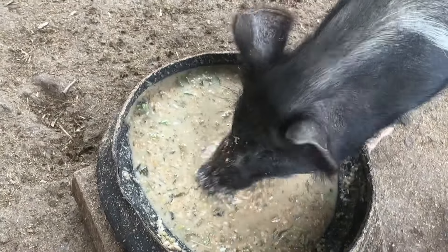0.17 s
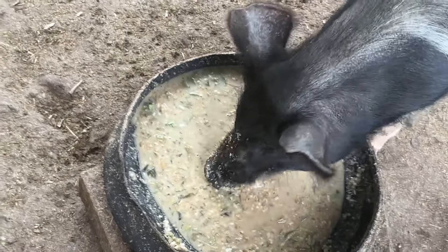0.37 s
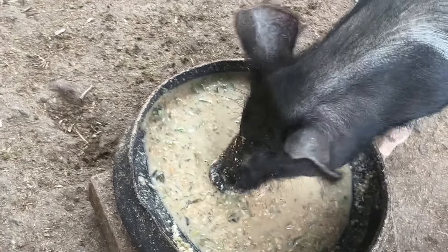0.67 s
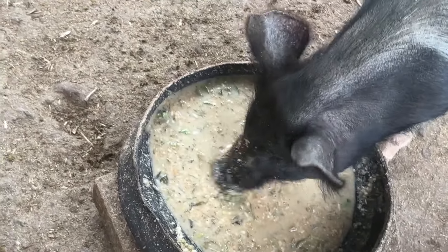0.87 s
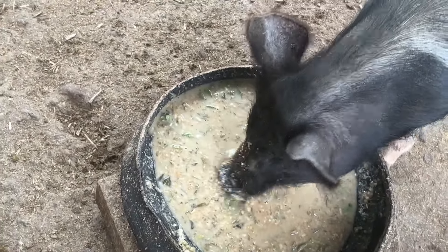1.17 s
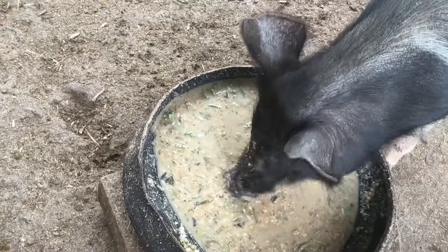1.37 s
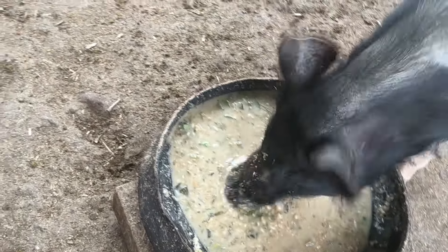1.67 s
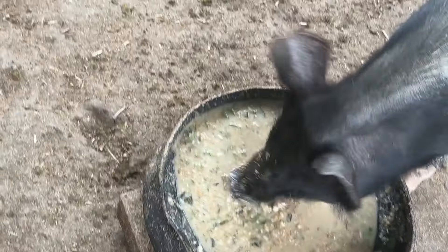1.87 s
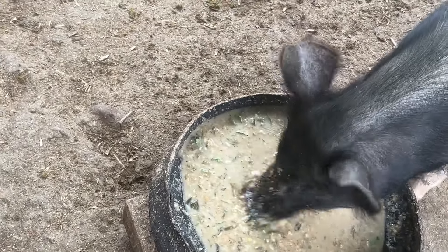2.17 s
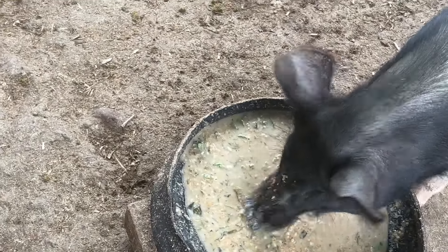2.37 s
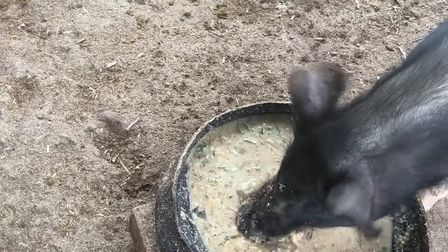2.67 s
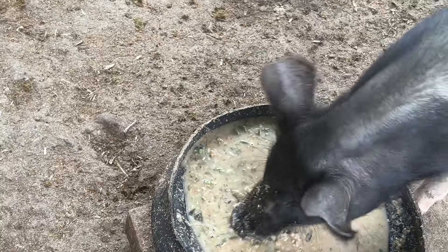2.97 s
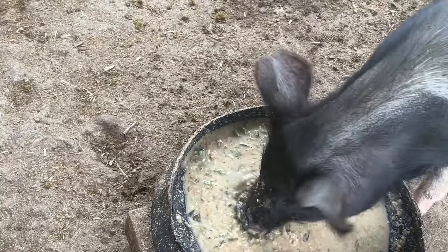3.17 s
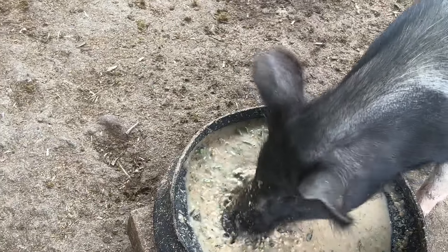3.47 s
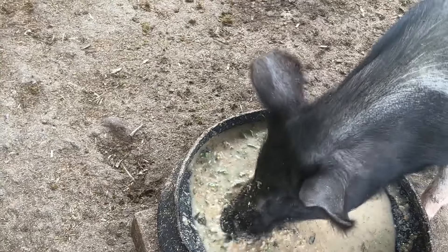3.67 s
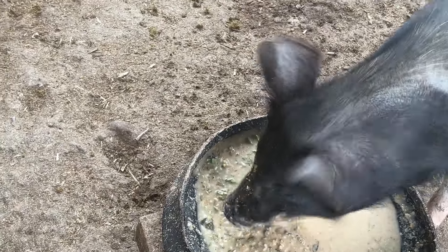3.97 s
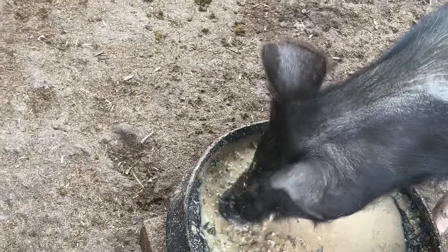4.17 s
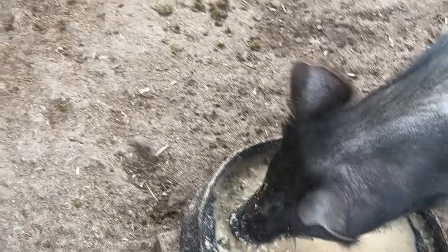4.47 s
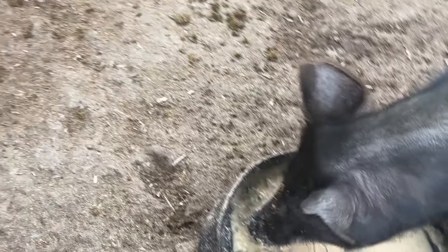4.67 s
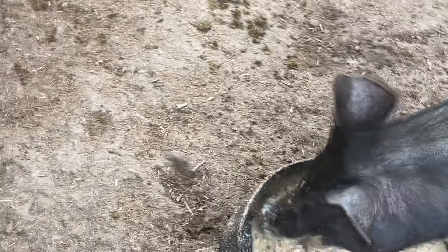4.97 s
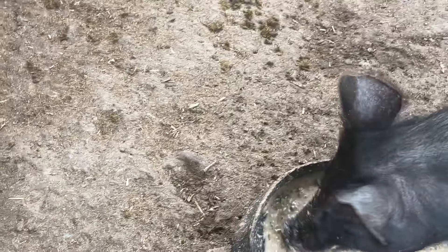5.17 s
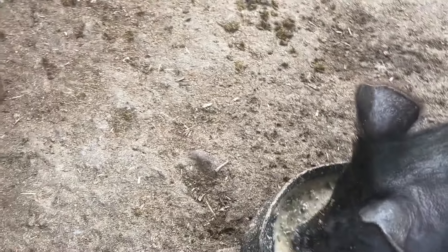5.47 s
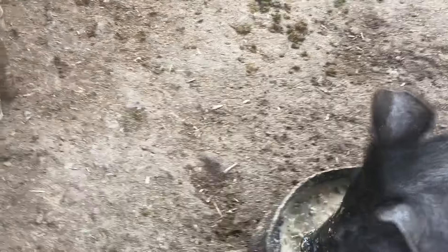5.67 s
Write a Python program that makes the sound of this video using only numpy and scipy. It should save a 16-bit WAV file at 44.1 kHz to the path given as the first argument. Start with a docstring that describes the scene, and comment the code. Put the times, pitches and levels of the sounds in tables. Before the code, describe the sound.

A pig eats wet mash from a rubber tub in an open pen, about a metre below the microphone. Its jaws smack three or four times a second, each chew a sharp, wet click with a hollow little plop. The mash squelches and faintly fizzes, and the snout sometimes bumps the tub softly. The chewing eases near the end. Faint, very high insect chirps pulse over quiet air.

```python
"""A pig eating wet mash

A pig eats from a rubber tub in an open pen, a metre below the microphone. Each chew is a
cluster of bursting saliva films and bubbles over hollow plops of the mouth. Mash squelches
and fizzes, and the snout bumps the tub. Insects buzz in short, very high chirps over quiet air."""
import sys
import numpy as np
from scipy import signal
from scipy.fft import rfft, irfft
from scipy.io import wavfile

SR = 44100
rng = np.random.default_rng(int(sys.argv[2]) if len(sys.argv) > 2 else 0)


def persist_wave(psi):
    """Save psi, clipped to +-1, as 16-bit WAV."""
    counts = np.round(np.clip(psi, -1, 1) * 32767).astype(np.int16)
    wavfile.write(sys.argv[1], SR, np.atleast_2d(counts).T)


N = 255763
TIME = np.arange(N) / SR
HIGHEST_HZ = 16050
LEAD_S = 256 / SR  # a bubble starts to swell before its peak
BUBBLE_TIME = np.arange(1024) / SR - LEAD_S
TINY_BUBBLE_TIME = BUBBLE_TIME[:600]
SNAP_HZ, LIP_HZ = 4234, 3000  # middle pitches of the lesser bubbles
SNAP_RING_DB, LIP_SPRAY_DB = -6, -8  # compared with the crack they belong to

# Smacks of the jaws, three or four a second. Each row: start in seconds, length in seconds,
# first snap in dB, last snap in dB, spray in dB, big bubble's pitch in Hz, its level in dB,
# base pitch of the mouth in Hz, plop in dB, squelch in dB.
JAW_SMACKS = [(.1612, 0.0093, -36, -27, -32.5, 4160, -33, 880, -24, -39),
              (0.4285, 0.0085, -35, -37, -28.5, 4470, -32, 833, -43.5, -45),
              (0.8348, 0.015, -41, -41, -37.5, 5970, -33, 694, -32, -42),
              (1.0778, 0.03, -27, -31.5, -31, 1700, -29.5, 925, -42, -65),
              (1.4518, .011, -30, -33, -33.5, 7410, -35, 738, -30.5, -51),
              (1.655, 0.0065, -31.5, -25, -27, 4170, -20, 810, -28.5, -36.5),
              (1.8553, .019, -30, -39, -37, 1990, -37.5, 960, -34.5, -46),
              (2.135, .011, -37, -25, -31.5, 3580, -31, 840, -28, -34),
              (2.4418, 0.021, -31, -36.5, -30, 7560, -30.5, 766, -31, -41),
              (2.6349, 0.013, -32.5, -30.5, -31, 1750, -32.5, 680, -25, -39),
              (2.8378, 0.013, -21.5, -20.5, -26, 2046, -15, 740, -19.5, -35.5),
              (3.1053, .037, -35, -38.5, -33, 1695, -35.5, 760, -34, -42.5),
              (3.345, .003, -25.5, -51, -26, 4280, -22.5, 873, -31.5, -45),
              (3.563, 0.0081, -29, -27.5, -29, 4090, -25, 740, -33.5, -51),
              (3.77, 0.0023, -24, -42, -31.5, 8340, -36, 630, -24, -50),
              (3.9843, 0.023, -30.5, -64, -35, 7980, -36, 840, -31, -41.5),
              (4.23, 0.028, -42, -29, -29, 6480, -31, 687, -34.5, -38),
              (4.647, 0.0054, -35, -48, -31.5, 3604, -27.5, 806, -38.5, -42.5),
              (5.008, 0.006, -33, -35, -38.5, 3940, -33, 586, -30.5, -45)]


def tongue_snaps(count=3, spread_octaves=0.465, peel_db=-7.5):
    """A smack opens and ends with a snap; small ones fall between as the tongue peels away."""
    for smack, chance in zip(JAW_SMACKS, rng.random((len(JAW_SMACKS), count + 2, 3))):
        start, length, first_db, last_db, spray_db, big_hz, big_db = smack[:7]
        pitches = SNAP_HZ * 2 ** (spread_octaves * (2 * chance[:, 0] - 1))
        first = start, first_db, spray_db, first_db >= last_db
        last = start + length, last_db, spray_db - 4.5, first_db < last_db
        for hz, (at, db, spray, louder) in zip(pitches, (first, last)):
            if louder:  # the louder snap frees the big bubble
                yield at, big_hz, big_db, db, spray
            else:
                yield at, hz, db + SNAP_RING_DB, db, spray
        for k, (hz, (_, place, size)) in enumerate(zip(pitches[2:], chance[2:])):
            at = start + (length + .006) * (k + place) / count
            scatter_db = 4.5 * (2 * size - 1)
            db = (first_db + last_db) / 2 + peel_db + scatter_db
            yield at, hz, db, db, spray_db - 14.5 + scatter_db


def saliva_ticks(count=4, early_s=0.0083, reach_s=0.072):
    """The tongue comes unstuck just before each smack, and threads of saliva tick around it."""
    chances = 2 * rng.random((len(JAW_SMACKS), count, 3)) - 1
    for (start, _, first_db, _, spray_db, *_), chance in zip(JAW_SMACKS, chances):
        unstick_db = first_db - 11.5
        yield start - early_s, SNAP_HZ, unstick_db + SNAP_RING_DB, unstick_db, spray_db - 10
        for when, octave, size in chance:
            db = -46 + 6.5 * size
            yield start + reach_s * when, LIP_HZ * 2 ** octave, db, db, db + LIP_SPRAY_DB


# The lips parting. Each row: time in seconds, bubble pitch in Hz, bubble in dB, crack in dB.
LIP_CLICKS = [(0.141, 4670, -34, -34.5), (0.1838, 10900, -31, -37.5), (0.394, 3510, -28.5, -34),
              (0.869, 2797, -42, -38), (1.1405, 6260, -43, -42.5), (1.1513, 4050, -37, -36.5),
              (1.3944, 2610, -29.5, -35.5), (1.4375, 7400, -34, -38.5), (1.445, 4530, -31, -34),
              (1.5887, 3460, -32.5, -31.5), (1.8174, 3780, -40, -38), (1.9248, 4080, -32, -37),
              (2.085, 1350, -30, -35), (2.3737, 1735, -38.5, -36), (2.398, 8800, -41, -52),
              (2.5958, 1300, -30.5, -28.5), (2.7933, 1960, -43, -36.5), (3.0598, 3150, -34, -34.5),
              (3.3119, 3970, -54, -38.5), (3.508, 1940, -33, -44), (3.8059, 3270, -32.5, -39.5),
              (3.8646, 3890, -33.5, -33), (3.9491, 1850, -34, -42), (4.1763, 2975, -33, -36.5),
              (4.1957, 3100, -37.5, -50), (4.5345, 3040, -48, -36.5), (4.564, 1850, -37, -43),
              (4.9049, 2710, -39, -31), (4.9428, 1820, -34, -41), (4.9736, 1830, -34.5, -41),
              (5.1949, 4060, -36, -42.5), (5.2589, 1870, -27, -37), (5.329, 4280, -34.5, -40),
              (5.6073, 4610, -44, -37)]


def lip_snaps(twin_gap_s=0.0049, twin_octaves=0.48, twin_db=-5, spray_db_per_octave=7):
    """A lip film bursts with a click and a softer twin; the smaller the bubble, the more spray."""
    chances = 2 * rng.random((len(LIP_CLICKS), 2)) - 1
    for (at, hz, ring_db, crack_db), (gap, octave) in zip(LIP_CLICKS, chances):
        spray_db = crack_db + LIP_SPRAY_DB + spray_db_per_octave * np.log2(hz / LIP_HZ)
        yield at, hz, ring_db, crack_db, spray_db
        twin_hz = LIP_HZ * 2 ** (twin_octaves * octave)
        yield at + twin_gap_s * gap, twin_hz, ring_db + twin_db, crack_db + twin_db, spray_db + twin_db


def saliva_clicks(rise_s=0.00083, ring_s=0.00227):
    """A saliva film tears with a crack and a fine spray, and the bubble behind it rings."""
    out = np.zeros(N)
    for at, hz, ring_db, crack_db, spray_db in [*tongue_snaps(), *lip_snaps(), *saliva_ticks()]:
        decay_s = ring_s * np.exp(0.22 * rng.standard_normal())
        glide = rng.normal(0.017, 0.1027)
        crack = film_burst(low_hz=1292, high_hz=6616, scatter_s=0.0011, cycles=4.0, brightness=0.78)
        spray = film_burst(low_hz=6540, high_hz=15810, scatter_s=0.001, cycles=3.5, brightness=0.22)
        add(out, at - LEAD_S, at_level(bubble(hz, rise_s, decay_s, glide), ring_db))
        add(out, at - LEAD_S, at_level(crack, crack_db - 3))
        add(out, at - LEAD_S, at_level(spray, spray_db + 1))
    return out


def film_burst(low_hz, high_hz, scatter_s, cycles, brightness, count=16):
    """A film breaks into a handful of tiny pops, high and low, within a few milliseconds."""
    place = (np.arange(count) + rng.random(count)) / count
    hz = (low_hz * (high_hz / low_hz) ** place)[:, None]
    gains = rng.uniform(0.21, 1, count) * hz[:, 0] ** brightness
    delays = scatter_s * rng.standard_normal((count, 1))
    return gains @ bubble(hz, cycles / hz, cycles / hz, 0.0522, TINY_BUBBLE_TIME - delays)


def bubble(hz, rise_s, decay_s, glide, t=BUBBLE_TIME):
    """A pocket of air rings, loudest at t = 0, its pitch sliding as it changes size."""
    loudness = np.exp(-(np.minimum(t, 0) / rise_s) ** 2 - np.maximum(t, 0) / decay_s)
    pitch = hz * (1 + glide * np.tanh(t / (2 * decay_s)))
    return loudness * np.sin(2 * np.pi * (np.cumsum(pitch, -1) / SR + rng.random(np.shape(hz))))


# The mouth widens during a smack, so its plops sink in pitch. Each row: how far through the
# smack (0 to 1), extra delay in seconds, pitch multiplier, level change in dB.
FALLING_PLOPS = [(0, 0.00094, 0.96, 1.5), (.55, 0.00094, 0.8505, -3.5), (0.902, 0.00078, 0.759, -1.5),
                 (1, .014, 0.611, -17)]
# Extra hollow mouth plops, some within a smack, some between chews.
# Each row: time in seconds, mouth pitch in Hz, level in dB.
EXTRA_PLOPS = [(.8476, 975, -27), (1.8668, 830, -30), (1.888, 817, -32.5), (2.571, 880, -32.5),
               (2.795, 906, -31.5), (3.8028, 647, -33), (4.0038, 690, -31.5), (4.019, 425, -29.5),
               (4.186, 923, -35), (4.398, 940, -39), (4.845, 467, -36)]


def suction_releases():
    """Each smack lets the suction go in a short falling run of plops; extra single plops join in."""
    for start, length, *_, mouth_hz, plop_db, _ in JAW_SMACKS:
        for share, delay_s, ratio, db in FALLING_PLOPS:
            yield start + share * length + delay_s, mouth_hz * ratio, plop_db + db
    yield from EXTRA_PLOPS


def mouth_plops(cycles=0.93):
    """The hollow of the mouth rings briefly as the tongue pulls free."""
    out = np.zeros(N)
    for at, hz, db in suction_releases():
        glide = rng.normal(-0.12, 0.15)
        ring_s = cycles / hz
        for ratio, tone_db in ((1, -1), (1.552, -14), (0.591, -15)):  # mouth, overtone, soft cheeks
            add(out, at - LEAD_S, at_level(bubble(hz * ratio, ring_s, ring_s, glide), db + tone_db))
    return out


# The snout pushing through the mash between bites. Each row: middle in seconds, rough half length
# in seconds, level in dB, typical bubble pitch in Hz.
SNOUT_PUSHES = [(.10, 0.0064, -42, 4130), (0.352, 0.022, -46, 3970), (0.769, 0.015, -47, 1454),
                (1.039, 0.0065, -51, 3100), (1.614, 0.018, -40.5, 2594), (1.893, 0.026, -44, 2170),
                (2.51, 0.029, -44.5, 3960), (2.584, 0.023, -42, 1830), (2.749, 0.02, -48, 2510),
                (3.289, .028, -48.5, 5980), (3.504, 0.01, -39.5, 2535), (3.686, .025, -57, 3000),
                (3.947, 0.027, -46, 3084), (4.181, .016, -50, 3010), (4.38, 0.017, -47.5, 1626),
                (4.626, 0.015, -42, 2510), (4.735, 0.05, -51, 3525), (5.262, .007, -43, 2400),
                (5.318, 0.037, -45.5, 3050), (5.446, 0.048, -55, 2390), (5.63, 0.044, -49, 4510)]


def squeezes(mash_hz=2772):
    """Mash is squeezed by every smack, by every parting of the lips and by the rooting snout."""
    jaws = [(start + length / 2 + .003, .009 + .35 * length, db, mash_hz)
            for start, length, *_, db in JAW_SMACKS]
    lips = [(at, .011, crack_db - 13.5, mash_hz) for at, *_, crack_db in LIP_CLICKS]
    return jaws + lips + SNOUT_PUSHES


def squelches(spread_octaves=0.99, scatter_db=5, ring_s=.001, count=150):
    """Each squeeze bursts a cloud of small bubbles of mixed sizes."""
    out = np.zeros(N)
    for middle, half_s, db, typical_hz in squeezes():
        when, octave, size = np.clip(rng.standard_normal((3, count)), -2.2, 2.2)
        hz = np.minimum(typical_hz * 2 ** (spread_octaves * octave), HIGHEST_HZ)[:, None]
        pops = bubble(hz, ring_s / 2, ring_s, 0.1118, TINY_BUBBLE_TIME)
        # the bubbles share out the energy of the whole squeeze
        gains = amp(db) * unit(amp(scatter_db * size)) * np.sqrt(2 * half_s * SR / count)
        for at, gain, pop in zip(middle + half_s * when, gains, pops):
            add(out, at - LEAD_S, gain * pop / np.linalg.norm(pop))
    return out


# Soft, low bumps on the tub. Each row: start in seconds, pitch in Hz, level in dB.
SNOUT_BUMPS = [(.636, 170, -42), (.875, 162, -41.5), (1.47, 160, -44), (1.598, 104, -47),
               (2.926, 208, -40.5), (4.123, 147, -38), (4.174, 122, -39.5), (5.124, 394, -41.5),
               (5.257, 124, -40.5)]


def tub_bumps():
    """The snout nudges the heavy rubber tub, whose thud dies at once."""
    out = np.zeros(N)
    t = np.arange(SR // 10) / SR - 2 * LEAD_S
    for start, hz, db in SNOUT_BUMPS:
        thud = bubble(hz, rise_s=.004, decay_s=0.0047, glide=-0.17, t=t)
        add(out, start - LEAD_S, at_level(thud, db - 1))
    return out


# How the fizz in the tub swells and fades. Each row: time in seconds, level change in dB.
FIZZ_SWELLS = [(0, 1.5), (.6, -1.5), (1.3, 1.5), (2.0, 1.5), (2.6, -2), (3.0, -3), (3.6, 4.5), (4.5, -1),
               (5.3, 6.5), (5.8, -1)]


def mash_fizz(level_db=-55, pops_per_s=1500, ring_s=0.0017, pitch_count=36):
    """Tiny bubbles keep the stirred feed fizzing faintly."""
    out = np.zeros(N)
    for hz in np.geomspace(700, 9000, pitch_count):
        sizes = amp(3 * np.minimum(rng.exponential(1, N), 3))
        bursts = rng.random(N) < pops_per_s / pitch_count / SR
        pop = unit(bubble(hz, ring_s / 2, ring_s, glide=0.1124))
        out += signal.oaconvolve(sizes * bursts, pop)[:N]
    swell_db = np.interp(TIME, *np.transpose(FIZZ_SWELLS))
    return unit(out) * amp(level_db + swell_db + drift(10))


# The tone of the pen's echoes. Each row: frequency in Hz, level in dB.
ECHO_TONE = [(100, -1.5), (500, 1.5), (2000, 1), (5000, -0.5), (10000, 5), (16000, -2)]


def pen_echoes(sound, fade_s=0.099, tail_db=-10, ground_s=.0032, ground_db=-15, swap_hz=1.332, count=3):
    """One echo from the ground, then a faint scatter from the pen."""
    t = np.arange(SR // 3) / SR
    ground_delay = ground_s * (1 + 0.142 * drift(1.9))
    out = sound + amp(ground_db) * np.interp(TIME - ground_delay, TIME, sound)
    for k in range(count):  # fade between several echo tails so no pitch rings steadily
        echoes = rng.standard_normal(len(t)) * (rng.random(len(t)) < .12) * (t > 0.0014)
        tail = through(echoes * amp(-60 * t / fade_s), tone_filter(ECHO_TONE))
        share = np.cos(np.pi * (swap_hz * TIME + k / count)) * np.sqrt(2 / count)
        out += amp(tail_db) * through(sound * share, tail / np.linalg.norm(tail))
    return out


# Runs of insect chirps. Each row: start in seconds, end in seconds, seconds from one chirp
# to the next, level in dB, top pitch in Hz.
CHIRP_RUNS = [(-.09, 1.06, .241, -52.5, 11420), (1.68, 1.86, 0.16, -61, 11300),
              (1.849, 3.32, 0.2086, -49, 11440), (3.392, 4.527, .232, -48.5, 11400),
              (4.01, 4.662, 0.39, -55, 11000), (4.643, 5.86, 0.2, -53.5, 11370)]


def chirps(sounding_share=0.88):
    """Within a run the chirps follow at a steady beat."""
    for first, last, period, db, top_hz in CHIRP_RUNS:
        for start in np.arange(first, last, period):
            yield start, min(start + sounding_share * period, last), db, top_hz


def insects(ticks_per_s=112, tick_s=0.0012, climb_hz=430, climb_s=0.064, swell_s=0.041, fade_s=0.038):
    """Each chirp is a fast train of ticks driving a ringing note that climbs as it swells."""
    out = np.zeros(N)
    beat = np.cumsum(ticks_per_s * (1 + .025 * drift(9.2))) / SR
    rasp = drift(280) + 1j * drift(280)  # narrow noise, shifted up to the chirp's pitch below
    ticks = unit(0.55 + np.exp(-(beat % 1) / ticks_per_s / tick_s)) * rasp
    for start, end, db, top_hz in chirps():
        on = (TIME > start) & (TIME < end)
        t = TIME[on] - start
        hz = top_hz - climb_hz * np.exp(-t / climb_s)
        loudness = (1 - np.exp(-t / swell_s)) * np.minimum((end - start - t) / fade_s, 1)
        note = np.exp(2j * np.pi * np.cumsum(hz) / SR)
        out[on] += amp(db - 1) * loudness * (ticks[on] * note).real
    return out


# The tone of the outdoor hush. Each row: frequency in Hz, relative level in dB.
HUSH_TONE = [(30, -42), (60, -6.5), (95, -2), (200, -2), (415, -0.5), (866, -1.5), (1400, -4), (2000, -3),
             (4300, -9), (7000, -12), (10000, -11), (16000, -18)]


def outdoor_air(hush_db=-49, hum_hz=117, hum_db=-68):
    """Steady outdoor hush with a faint, wavering far-off hum."""
    sway_db = .4 * drift(5)
    hush = unit(through(rng.standard_normal(N), tone_filter(HUSH_TONE, size=8192)))
    hum = np.sin(2 * np.pi * np.cumsum(hum_hz + 2 * drift(2.6)) / SR)
    return hush * amp(hush_db + sway_db) + hum * amp(hum_db + 2 * drift(0.39))


def amp(db):
    """Turns decibels into a multiplier."""
    return 10 ** (np.asarray(db) / 20)


def unit(x):
    """Scales a signal to an average power of 1."""
    return x / np.sqrt(np.mean(x ** 2) + 1e-20)


def at_level(x, db):
    """Sets a short sound's level, as if all its energy fell within 3 milliseconds."""
    return amp(db) * x * np.sqrt(.003 * SR / (np.sum(x ** 2) + 1e-20))


def add(mix, start_s, sound):
    """Mixes a sound in at the given time."""
    part = mix[max(round(start_s * SR), 0):][:len(sound)]
    part += sound[:len(part)]


def tone_filter(points, size=1024):
    """Builds a filter from (Hz, dB) points that never rings ahead of the sound."""
    hz, db = np.transpose(points)
    bin_hz = abs(np.fft.fftfreq(size, 1 / SR))
    gain = amp(np.interp(np.log(bin_hz + 1), np.log(hz), db))
    return np.fft.ifft(np.exp(np.conj(signal.hilbert(np.log(gain))))).real


def through(x, response):
    """Passes a sound through a filter, keeping its length."""
    return signal.fftconvolve(x, response)[:len(x)]


def drift(rate_hz):
    """A smooth random wobble of typical size 1, with little motion faster than rate_hz."""
    rolloff = 1 + (np.fft.rfftfreq(N, 1 / SR) / rate_hz) ** 4
    return unit(irfft(rfft(rng.standard_normal(N)) / rolloff, N))


def scene():
    """The eating pig in its pen, the insects and the air."""
    pig = saliva_clicks() + mouth_plops() + tub_bumps() + squelches() + mash_fizz()
    return (pen_echoes(pig) + insects() + outdoor_air())[None]


def record(dry):
    """The microphone sheds deep rumble and the very highest treble."""
    thinned = signal.sosfilt(signal.butter(4, 55, "high", fs=SR, output="sos"), dry)
    treble_cut = signal.firwin(401, HIGHEST_HZ, window=("kaiser", 8), fs=SR)
    return signal.oaconvolve(thinned, treble_cut[None], "same")


dry = scene()
out = record(dry)
persist_wave(out)
```